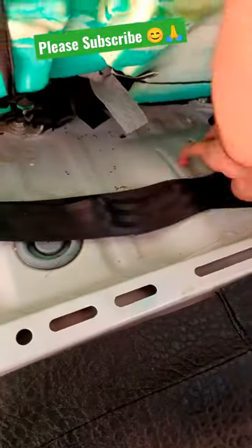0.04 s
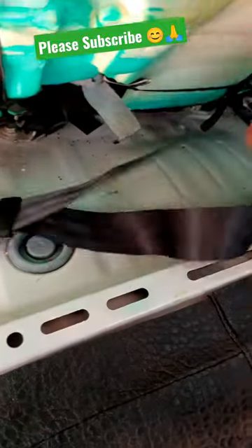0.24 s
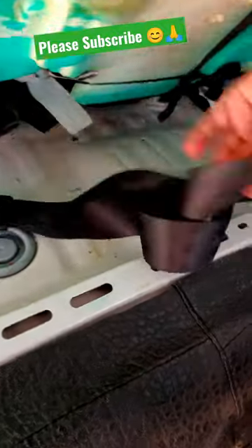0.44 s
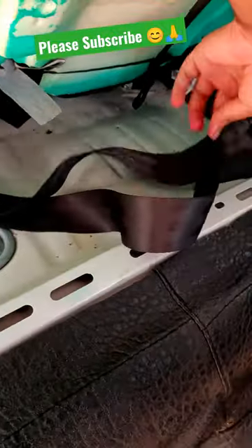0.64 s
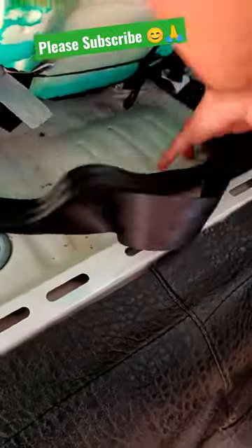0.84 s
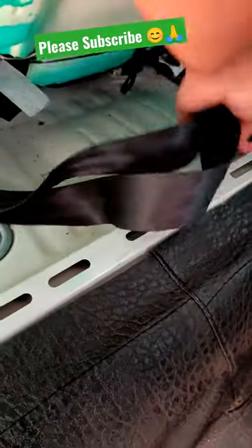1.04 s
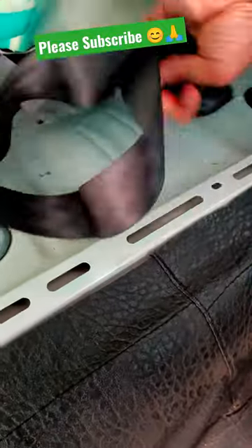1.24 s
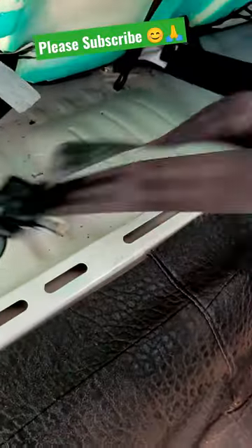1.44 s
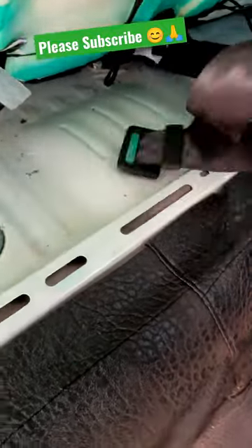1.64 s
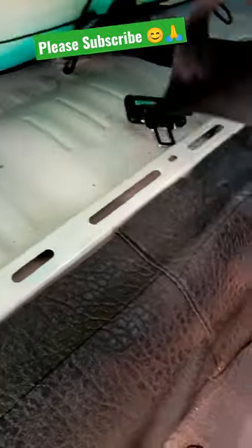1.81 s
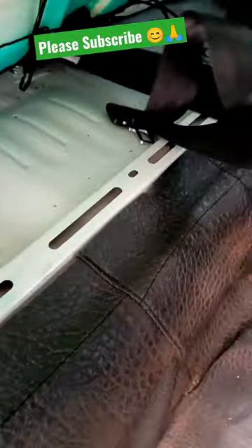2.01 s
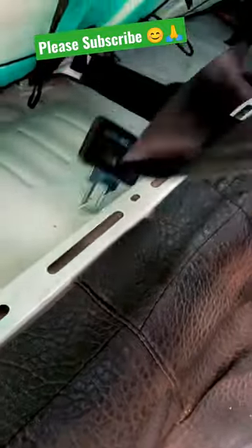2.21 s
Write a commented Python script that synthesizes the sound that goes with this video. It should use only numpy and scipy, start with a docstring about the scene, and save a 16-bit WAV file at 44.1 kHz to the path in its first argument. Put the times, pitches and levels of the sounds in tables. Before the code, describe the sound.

Close stereo microphone in a small car cabin: belt webbing rustles in short strokes, the floor pan thumps dully, then the buckle rasps and clatters hard before a few lighter scrapes.

```python
"""A seat belt is pulled out from under a car seat, close to a two-port microphone in the small cabin.
The webbing swishes over itself and the floor: thousands of tiny random slips, swelling and dying away.
Its buckle is dragged along, scraping in coarser slips and knocking on the sheet-steel floor pan, which
thuds and rings in damped modes; the metal tongue clinks. Behind it lie a floor rumble and faint noise."""
import sys
import numpy as np
from scipy import signal
from scipy.fft import rfft, irfft, next_fast_len
from scipy.io import wavfile

SR = 44100
rng = np.random.default_rng(int(sys.argv[2]) if len(sys.argv) > 2 else 0)


def transcribe(signal):
    """Save signal, clipped to [-1, 1], as a 16-bit WAV file at the path in sys.argv[1]."""
    frames = np.atleast_2d(signal).T
    limited = np.clip(frames, -1, 1)
    pcm = np.round(limited * 32767).astype(np.int16)
    wavfile.write(sys.argv[1], SR, pcm)


N = 99974
TIME = np.arange(N) / SR
HIT_SIZE, ATTACK_SIZE = SR // 2, SR // 50   # samples: 0.5 s and 20 ms

# the floor pan's main hollow note under a scrape, and its strength and decay at any pitch
HOLLOW_HZ, HOLLOW_MODE_DB, HOLLOW_T60_S = 998, 10, 0.04
RING_EDGES_HZ = (440, 1076)
SLIPS_PER_S, SLIP_SPREAD_DB = 1500, 3   # buckle slips; the spread also serves the webbing's snags


def from_db(db):
    """Decibels to gain."""
    return 10 ** (np.asarray(db) / 20)


def rms_one(x):
    """Scale to unit power."""
    return x / np.sqrt(np.mean(x ** 2) + 1e-20)


def attack_one(x):
    """Scale a hit to unit power over its first 20 ms."""
    return x / np.sqrt(np.mean(x[..., :ATTACK_SIZE] ** 2) + 1e-20)


def add(out, start_s, x):
    """Mix a sound in at a time, cutting what runs past the end."""
    i = int(np.clip(start_s * SR, 0, N - 1))
    out[:, i:i + x.shape[-1]] += x[..., :N - i]


def colour(x, spectrum, share=1):
    """Filter by a share of a (frequency_hz, gain_db) curve, joined up along log frequency."""
    hz, db = np.transpose(spectrum)
    size = next_fast_len(x.shape[-1] + 2048)
    f = np.maximum(np.fft.rfftfreq(size, 1 / SR), 1)
    gain = from_db(share * np.interp(np.log(f), np.log(hz), db))
    return irfft(rfft(x, size) * gain, size)[..., :x.shape[-1]]


def band(x, edges_hz):
    """Keep one band."""
    return signal.sosfilt(signal.butter(3, edges_hz, "band", fs=SR, output="sos"), x)


def ring(x, modes):
    """Drive parallel resonators, one per (pitch_hz, level_db, t60_s) mode."""
    out = 0
    for hz, db, t60 in modes:
        radius = from_db(-60 / (t60 * SR))   # decay per sample
        angle = 2 * np.pi * hz / SR
        feed = [np.sin(angle), 0, -np.sin(angle)]
        feedback = [1, -2 * radius * np.cos(angle), radius * radius]
        out = out + from_db(db) * signal.lfilter(feed, feedback, x + 1e-18) / np.sin(angle)
    return out


def dying_noise(t60, channels=2):
    """Noise that falls 60 dB in t60 seconds, with unit energy per channel on average."""
    x = rng.standard_normal((channels, HIT_SIZE)) * from_db(-60 * TIME[:HIT_SIZE] / t60)
    return rms_one(x) / np.sqrt(HIT_SIZE)


def cabin(x):
    """The close cabin: direct sound plus a short and a longer dying noise, different at each port."""
    early_t60_s, late_t60_s, direct_db, late_db = 0.054, 0.15, -11, -8
    response = dying_noise(early_t60_s) + from_db(late_db) * dying_noise(late_t60_s)
    response[:, 0] += from_db(direct_db)
    return signal.fftconvolve(x[None], response, axes=1)[:, :len(x)]


def stroke(top_s, rise_s, fall_s):
    """A movement swells to its top and dies away, by 20 dB over each of the two spans."""
    longest_rise_s, longest_fall_s = 0.13, 0.24
    rise_curve, fall_curve = 1.3, 1.1
    before = np.maximum(top_s - TIME, 0) / min(rise_s, longest_rise_s)
    after = np.maximum(TIME - top_s, 0) / min(fall_s, longest_fall_s)
    return from_db(-20 * np.minimum(before ** rise_curve + after ** fall_curve, 10))


def grains(per_s, spread_db):
    """Random tiny slips of uneven size and either sign, at unit power."""
    sizes = from_db(spread_db * np.minimum(rng.exponential(1, N), 5)) * rng.choice([-1, 1], N)
    return rms_one(sizes * (rng.random(N) < per_s / SR))


def flutter():
    """Sliding goes in small jerks: a smoothed random gain."""
    depth_db, width_s = 1.9, 0.006   # rms depth; two standard deviations of the smoothing bell
    lag = np.arange(-ATTACK_SIZE, ATTACK_SIZE)
    kernel = np.exp(-0.5 * (lag / (width_s * SR / 2)) ** 2)
    wander = signal.fftconvolve(rng.standard_normal(N), kernel, "same")
    return from_db(depth_db * rms_one(wander))


def chatter(length_s):
    """A brief chatter of contact: noise with this decay time constant, heard in the cabin."""
    return cabin(rng.standard_normal(HIT_SIZE) * np.exp(-TIME[:HIT_SIZE] / length_s))


def floor_ring(x, hollow_hz):
    """The floor pan's hollow note and nearby modes; each port hears a different mix of the two drives."""
    # higher, ringing modes of the floor pan: pitch_hz, level_db, t60_s
    ring_modes = [(622.5, -15, 0.22), (722, -6, 0.078), (924, -1, 0.039), (1180, -2, 0.077)]
    side_db = 1
    drive = x[0] + from_db(side_db) * x[1] * np.array([[1], [-1]])
    modes = [*ring_modes, (hollow_hz, HOLLOW_MODE_DB, HOLLOW_T60_S)]
    return band(ring(drive, modes), RING_EDGES_HZ)


def background():
    """The quiet background of the cabin: steady coloured noise, independent at each port."""
    # spectrum of the background: frequency_hz, gain_db
    background_spectrum = [(120, 3), (500, 7.5), (1500, 1.5), (2400, 6.5), (4000, -1.5), (15500, -9.5)]
    level_db = -52.5
    return from_db(level_db) * rms_one(colour(rng.standard_normal((2, N)), background_spectrum))


def rumble():
    """Dense random impulses keep the floor pan rumbling under the belt; the lighter the touch, the duller."""
    # rumble of the floor pan under the moving belt: time_s, level_db
    rumble_level = [(0, -38.5), (.115, -47), (.17, -24), (.35, -29), (.39, -32.5), (.48, -28.5),
                    (.54, -32.5), (.76, -30.5), (.82, -43.5), (.95, -39), (1.02, -29), (1.13, -19),
                    (1.23, -38), (1.43, -39.5), (1.55, -24.5), (1.83, -25), (1.93, -31), (2.27, -27)]
    # spectrum of the rumble: frequency_hz, gain_db
    rumble_spectrum = [(25, 5.5), (55, -18), (90, 3.5), (130, 1), (190, 0), (260, -5.5), (380, -2.5),
                       (520, -20), (1000, -17.5), (2500, -79)]
    firm_touch_db, light_touch = -30.5, [(200, 1), (380, -9)]   # light touch: frequency_hz, gain_db
    side_db = -18   # the two ports hear nearly the same
    middle, side = grains(2000, 2), grains(2000, 2)
    stereo = middle + from_db(side_db) * side * np.array([[1], [-1]])
    steady = rms_one(colour(stereo, rumble_spectrum))
    force = from_db(np.interp(TIME, *np.transpose(rumble_level)))
    firm = np.minimum(force / from_db(firm_touch_db), 1)
    return force * (firm * steady + (1 - firm) * colour(steady, light_touch))


def clinks():
    """The metal tongue is touched: a bright snap and one brief note, direct and in the cabin."""
    # small clinks of the tongue: start_s, level_db, pitch_hz, snap_db (relative to the note)
    clink_list = [(0.157, -36, 6200, -11), (0.798, -53, 6430, -3), (0.848, -61.5, 2350, -19),
                  (1.327, -52.5, 1470, -16), (1.625, -28, 8950, -6), (1.628, -29.5, 5550, -4)]
    note_t60_s, snap_t60_s, room_db = 0.009, 0.015, 3
    out = np.zeros((2, N))
    touch = signal.unit_impulse(HIT_SIZE)
    for start_s, level_db, pitch_hz, snap_db in clink_list:
        note = attack_one(ring(touch, [(pitch_hz, 0, note_t60_s)]))
        snap = attack_one(band(dying_noise(snap_t60_s, channels=1)[0], (5000, 16000)))
        clink = note + from_db(snap_db) * snap
        add(out, start_s, from_db(level_db) * (clink + from_db(room_db) * cabin(clink)))
    return out


def thud(pitch_hz):
    """A blow gives a short thump and wakes mostly the low modes near its pitch, set by where it lands."""
    # low modes of the floor pan: pitch_hz, level_db, t60_s
    pan_modes = [(98.3, -11, 0.39), (130, -2.5, 0.36), (183.5, 1, 0.23), (208.7, 0, 0.091),
                 (278, 5.5, 0.093), (320.3, 1.5, 0.097), (382.6, 9, 0.057), (473, -9.5, 0.17),
                 (599, -3, 0.079)]
    thump_db, thump_t60_s, push_s = 16, 0.04, 0.0039   # push: time constant of the onset
    width_oct, spread_db = 0.65, 1.8
    t = TIME[:HIT_SIZE]
    out = from_db(thump_db - 60 * t / thump_t60_s) * np.sin(2 * np.pi * pitch_hz * t)
    for hz, db, t60 in pan_modes:
        nearness = 1 / (1 + (np.log2(hz / pitch_hz) / width_oct) ** 2)
        weight = nearness * from_db(db + rng.normal(0, spread_db))
        tone = np.sin(2 * np.pi * hz * rng.normal(1, 0.012) * t + rng.normal(0, 0.6))
        out = out + weight * tone * from_db(-60 * t / t60)
    return attack_one(out * (1 - np.exp(-t / push_s)))


def clack(pitch_hz):
    """The buckle's case clacks: a band of contact chatter and one short note that it excites."""
    edges_hz, chatter_s, case_t60_s, body_db = (680, 3100), 0.0029, 0.01, -2
    contact = band(chatter(chatter_s), edges_hz)
    note = attack_one(ring(contact, [(pitch_hz, 0, case_t60_s)]))
    return attack_one(note + from_db(body_db) * attack_one(contact))


def tick():
    """Metal ticks: very short, bright contact chatter."""
    # spectrum of the tick: frequency_hz, gain_db
    tick_spectrum = [(2500, 1.5), (4200, 9), (5600, 7), (7500, 0.5), (11000, 3), (15500, -5)]
    return attack_one(colour(chatter(0.0027), tick_spectrum))


def knocks():
    """The floor thuds and rings, the case clacks, the metal ticks; spot and corner set the notes."""
    # knocks on the floor pan, levels before the trims below: start_s, thud_db, thud_pitch_hz,
    # ring_db, ring_pitch_hz, clack_db, clack_pitch_hz, tick_db
    knock_list = [(0.151, -14.5, 136, -23.5, 960, -26, 1590, -33.5),
                  (0.204, -13.5, 185, -28, 984, -60, 2260, -23),
                  (0.27, -17, 250, -28, 870, -26.5, 1760, -36.5),
                  (0.402, -13.5, 205, -29, 1045, -36, 2480, -39.5),
                  (0.553, -13.5, 237.6, -14.5, 990, -24, 2760, -38),
                  (0.557, -14.5, 173, -20, 1052, -23, 2600, -41),
                  (0.968, -13.5, 112, -18.5, 936, -29, 2380, -32.5),
                  (1.070, -16.5, 189, -23.5, 944, -34, 3430, -22.5),
                  (1.104, -18, 97, -29.5, 970, -42, 2723, -53),
                  (1.162, -24.5, 320, -18.5, 1094, -15, 2130, -18.5),
                  (1.479, -11.5, 214, -16.5, 1020, -27, 2170, -42),
                  (1.566, -12.5, 206, -13.5, 896, -20, 2400, -25.5),
                  (1.638, -29, 185, -19, 990, -12.5, 1490, -17),
                  (1.716, -19, 179, -18.5, 904, -24.5, 2800, -29.5),
                  (1.739, -16.5, 182, -24, 920, -24.5, 1800, -32),
                  (1.772, -20, 185, -27, 940, -9.5, 1620, -24.5),
                  (1.790, -13, 234, -17.5, 946, -29, 1540, -27),
                  (1.808, -8.5, 162, -30, 1030, -38, 2780, -24.5),
                  (1.818, -8, 193, -17, 987, -20.5, 2780, -30),
                  (1.86, -12.5, 276, -23.5, 904, -17, 2210, -23),
                  (1.909, -24.5, 326, -30, 970, -22, 1760, -43),
                  (2.096, -23, 212, -19.5, 1001, -26, 1790, -36),
                  (2.173, -13.5, 163, -32, 900, -31.5, 2150, -33)]
    # further thuds of the floor pan, some part of a knock, without ring, clack or tick of their own,
    # levels before the thud trim: start_s, thud_db, thud_pitch_hz
    further_thuds = [(0.032, -23, 111), (.153, -18.5, 347), (.278, -23, 570), (0.28, -13.5, 222),
                     (.419, -14, 211), (0.437, -13.5, 199), (.76, -27.5, 177), (0.973, -17, 346),
                     (1.345, -34.5, 125), (1.501, -17, 200), (1.656, -15.5, 183)]
    thud_trim_db, ring_trim_db, clack_trim_db, tick_trim_db = -2, -4.5, -4, -1.66
    ring_contact_s = 0.012   # t60 of the noise that drives the ring
    out = np.zeros((2, N))
    for start_s, thud_db, thud_hz, ring_db, ring_hz, clack_db, clack_hz, tick_db in knock_list:
        rung = attack_one(floor_ring(dying_noise(ring_contact_s), ring_hz))
        add(out, start_s, from_db(thud_trim_db + thud_db) * thud(thud_hz))
        add(out, start_s, from_db(ring_trim_db + ring_db) * rung)
        add(out, start_s, from_db(clack_trim_db + clack_db) * clack(clack_hz))
        add(out, start_s, from_db(tick_trim_db + tick_db) * tick())
    for start_s, thud_db, thud_hz in further_thuds:
        add(out, start_s, from_db(thud_trim_db + thud_db) * thud(thud_hz))
    return out


def buckle_drag():
    """The buckle sticks and slips on the painted steel, rasping and setting the floor ringing."""
    # scrapes of the buckle: top_s, rasp_db, floor_ring_db (before the floor trims), rise_s, fall_s
    scrapes = [(0.244, -30, -30.5, 0.037, 0.12), (0.329, -34, -28.5, 0.0088, 0.038),
               (0.439, -32.5, -46, 0.066, 0.14), (0.561, -29, -28.5, 0.022, 0.067),
               (0.701, -46.5, -48, .13, 0.12), (1.1, -34.5, -33, 0.21, 0.16),
               (1.543, -27, -29, 0.032, 0.16), (1.619, -17, -15, 0.016, 0.014),
               (1.652, -12, -17.5, 0.011, 0.066), (1.68, -35, -41, .03, 0.29),
               (1.781, -17.5, -13, 0.018, 0.061), (1.92, -20, -20.5, 0.021, 0.032),
               (2, -37.5, -28, 0.15, 0.08), (2.076, -25.5, -36, 0.11, 0.076),
               (2.113, -41, -19, 0.076, 0.03), (2.239, -19.5, -34, 0.022, 0.11),
               (2.26, -30.5, -21, 0.082, 0.066)]
    # spectrum of the rasp: frequency_hz, gain_db
    rasp_spectrum = [(500, 3), (1250, -5.5), (1660, 4.5), (2000, -2), (2300, 8.5), (3000, -4.5), (4200, -6),
                     (8000, -25.5)]
    floor_trim_db, hollow_trim_db = -3, -6.5
    slips = cabin(grains(SLIPS_PER_S, SLIP_SPREAD_DB) * flutter())
    power = 0
    for top_s, rasp_db, ring_db, rise_s, fall_s in scrapes:
        power = power + (from_db([[rasp_db], [ring_db]]) * stroke(top_s, rise_s, fall_s)) ** 2
    rasp_level, ring_level = np.sqrt(power)
    # a second stream of slips sounds the hollow note alike at both ports
    hollow = ring(grains(SLIPS_PER_S, SLIP_SPREAD_DB), [(HOLLOW_HZ, 0, HOLLOW_T60_S)])
    hollow = rms_one(band(hollow, RING_EDGES_HZ))
    floor = from_db(floor_trim_db) * rms_one(floor_ring(slips, HOLLOW_HZ))
    floor = floor + from_db(hollow_trim_db) * hollow
    return rasp_level * rms_one(colour(slips, rasp_spectrum)) + ring_level * floor


def webbing():
    """Woven fibres catch and slip by the thousand as the belt slides; whole ribs of the weave snag too."""
    # swishes of the webbing, before level_db: top_s, swish_db, rise_s, fall_s
    swishes = [(.04, -54, .1, 0.11), (0.157, -32, 0.015, 0.074), (0.208, -32.5, 0.023, 0.14),
               (0.243, -24.5, 0.021, 0.012), (0.345, -33, 0.03, 0.032), (0.428, -44.5, 0.085, 0.45),
               (0.563, -38, 0.052, 0.045), (0.753, -46.5, 0.015, 0.045), (.9, -49, 0.042, 0.057),
               (1.049, -30, 0.039, 0.074), (1.078, -33.5, 0.0055, 0.12), (1.134, -30, 0.025, 0.013),
               (1.22, -46.5, .04, 0.36), (1.468, -47, 0.14, 0.044), (1.566, -22.5, 0.05, 0.031),
               (1.59, -24, .004, 0.028), (1.627, -17.5, 0.02, 0.052), (1.665, -21.5, 0.021, 0.045),
               (1.93, -40.5, 0.03, 0.099), (2.242, -33.5, 0.012, 0.027)]
    # spectrum of the sliding webbing: frequency_hz, gain_db
    webbing_spectrum = [(300, -29), (1200, 3), (2300, 10.5), (3600, 5.5), (5400, 5), (7500, -0.5),
                        (11000, -1), (15500, -9.5)]
    fibres_per_s, fibre_spread_db = 10000, 6
    snags_per_s, snag_db = 260, -3
    level_db = 3
    power = 0
    for top_s, swish_db, rise_s, fall_s in swishes:
        power = power + (from_db(swish_db) * stroke(top_s, rise_s, fall_s)) ** 2
    speed = np.sqrt(power)
    slips = grains(fibres_per_s, fibre_spread_db)
    slips = slips + from_db(snag_db) * grains(snags_per_s, SLIP_SPREAD_DB)
    return from_db(level_db) * speed * flutter() * rms_one(colour(cabin(slips), webbing_spectrum))


def scene():
    """Belt and buckle over the quiet background of the cabin."""
    return background() + rumble() + clinks() + knocks() + buckle_drag() + webbing()


def record(dry):
    """Each microphone port colours the sound; deep bass is cut, peaks are rounded, the top is cut."""
    # colour of the left port against the right, half given to each: frequency_hz, gain_db
    port_colour = [(210, -1.5), (400, 3), (650, 0), (1050, -10), (1800, 3.5), (2400, 1.5), (5400, 0.5),
                   (6700, -5), (8200, 3.5), (11500, 2), (13500, -14.5)]
    low_cut_hz, cutoff_hz = 108, 16000
    ports = np.array([colour(dry[0], port_colour, 1 / 2), colour(dry[1], port_colour, -1 / 2)])
    ports = signal.sosfilt(signal.butter(2, low_cut_hz, "high", fs=SR, output="sos"), ports)
    rounded = 1.05 * np.tanh(ports / 1.05)
    low_pass = signal.ellip(12, 0.1, 90, cutoff_hz, fs=SR, output="sos")
    return signal.sosfilt(low_pass, rounded)


dry = scene()
out = record(dry)
transcribe(out)
```